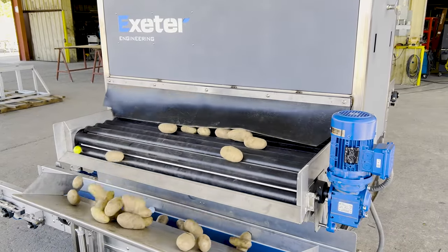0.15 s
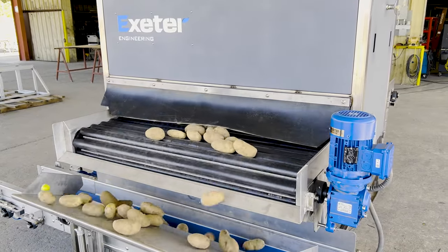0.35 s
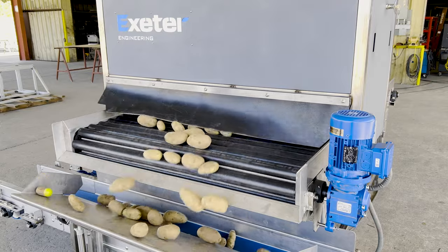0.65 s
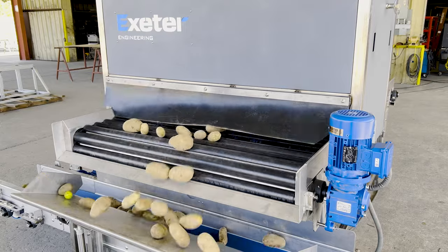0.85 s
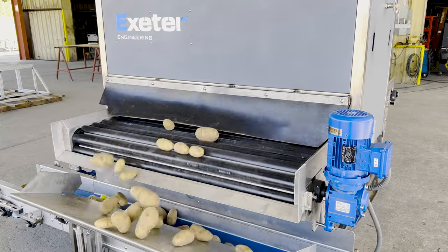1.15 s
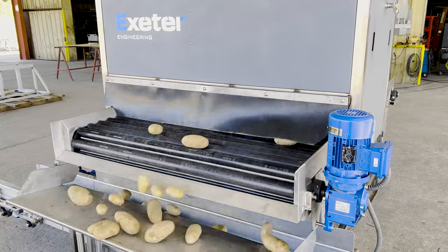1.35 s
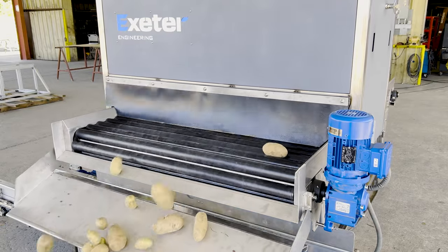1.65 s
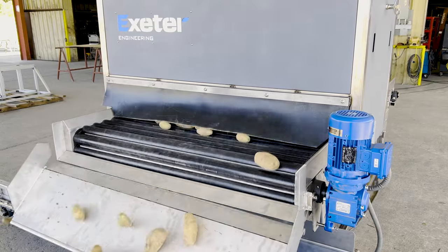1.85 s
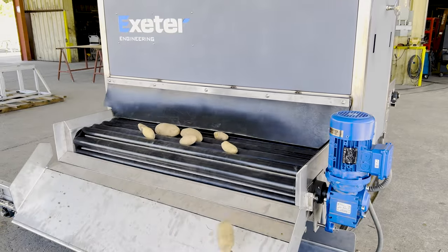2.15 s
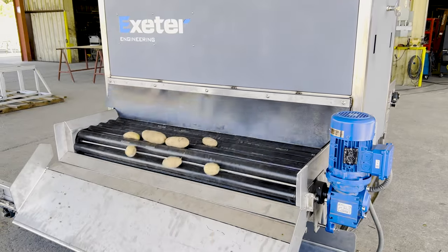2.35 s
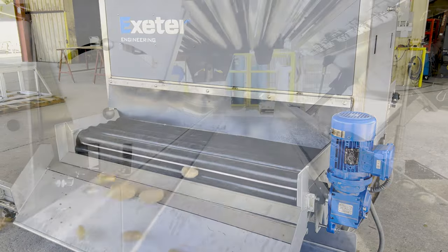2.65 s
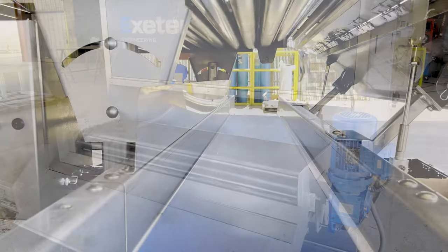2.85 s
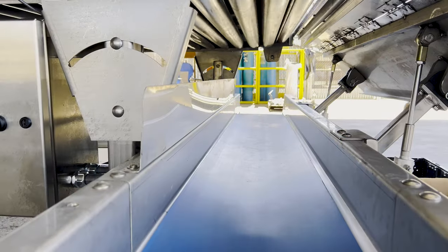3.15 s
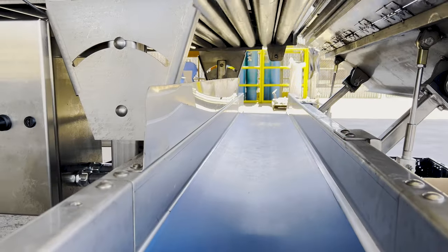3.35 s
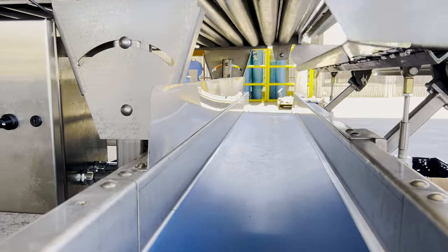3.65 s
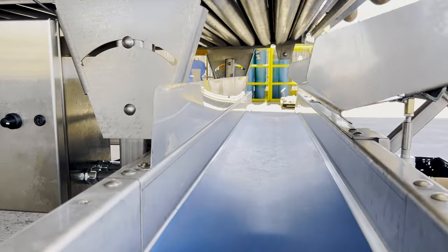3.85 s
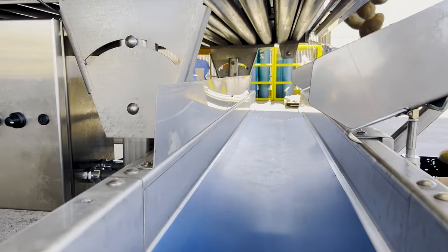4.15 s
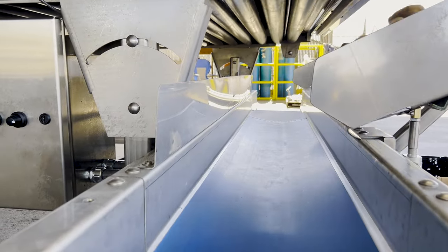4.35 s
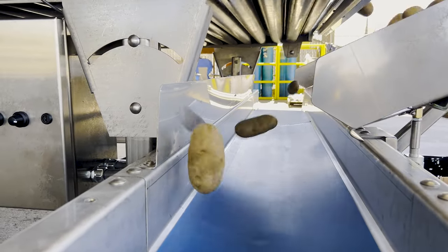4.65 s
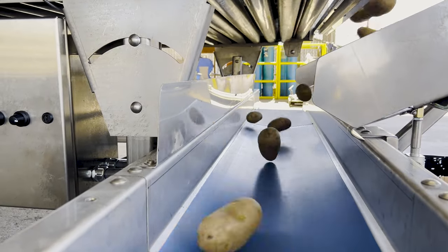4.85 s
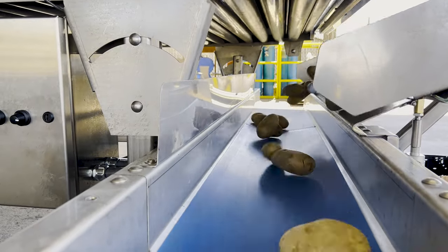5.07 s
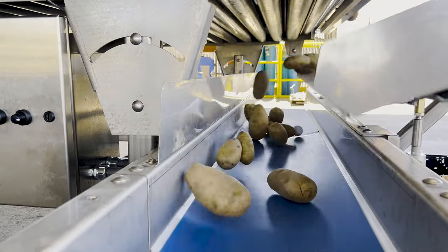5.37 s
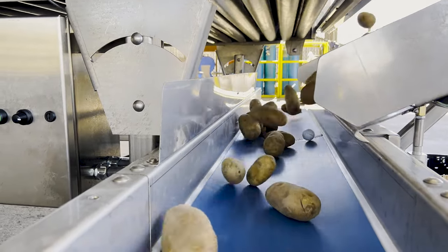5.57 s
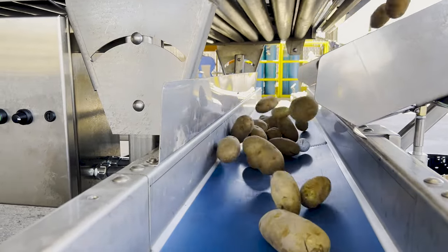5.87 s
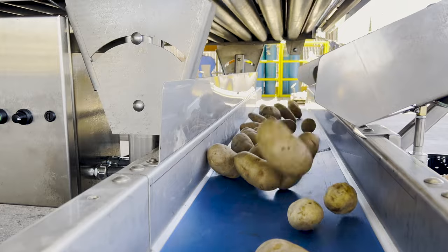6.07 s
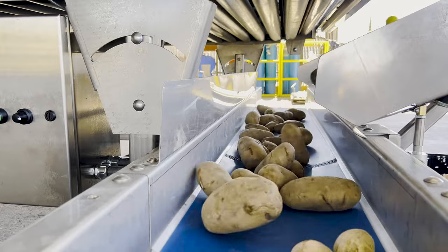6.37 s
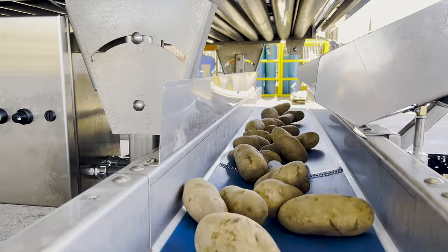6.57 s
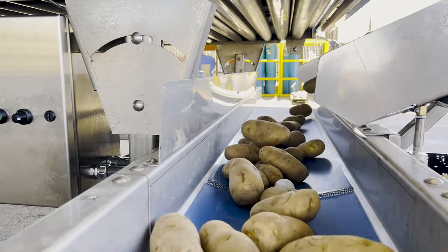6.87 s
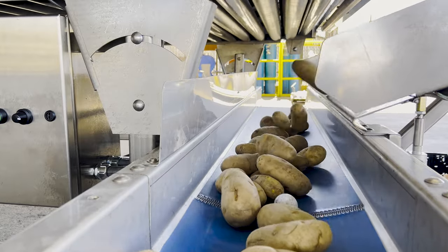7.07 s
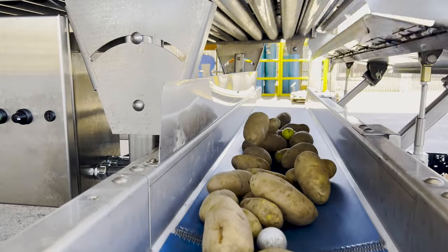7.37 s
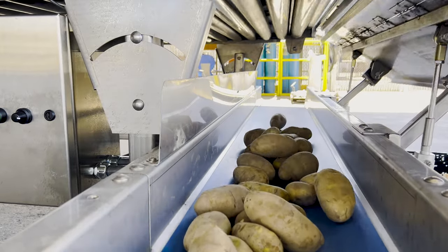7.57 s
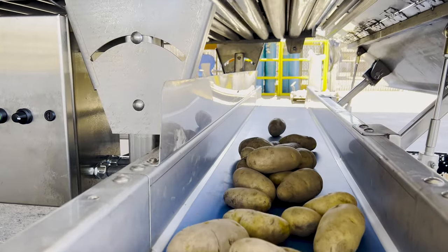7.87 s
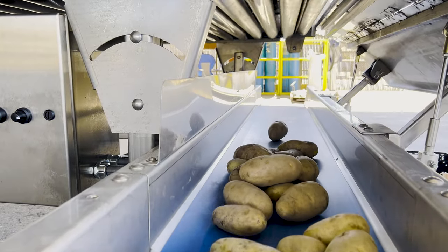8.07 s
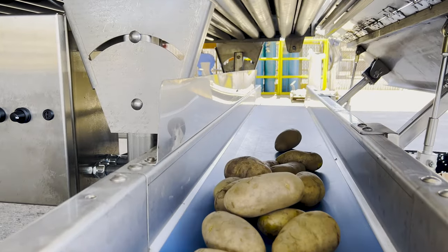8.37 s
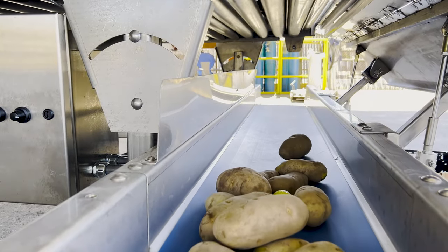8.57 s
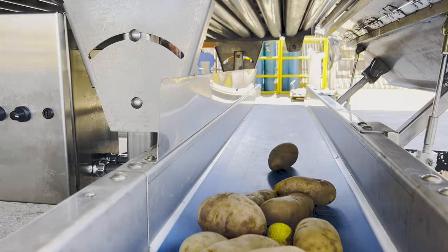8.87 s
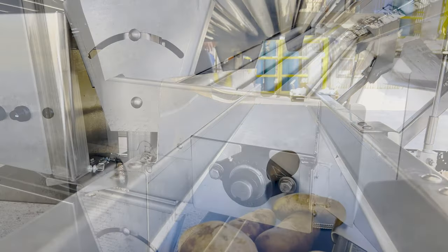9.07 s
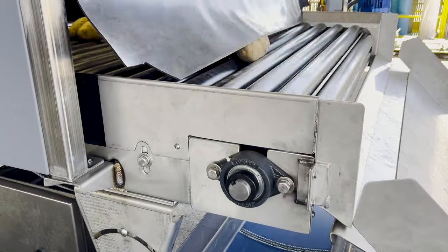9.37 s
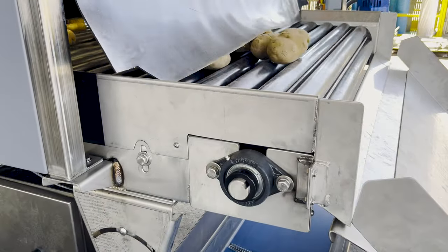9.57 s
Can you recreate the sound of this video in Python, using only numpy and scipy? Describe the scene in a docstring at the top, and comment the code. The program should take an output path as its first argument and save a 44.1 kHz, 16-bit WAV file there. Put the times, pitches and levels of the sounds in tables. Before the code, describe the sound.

Close conveyor machinery runs and rumbles while potatoes knock on ringing metal panels and scrape down a chute.

```python
"""A potato line in a shed, heard close on a two-port microphone from three spots that fade into each other.
At first potatoes thud on ringing panels and clack on steel rollers, over motors, rattle and a thin whine.
After a lull near 3 s a tilting sheet-metal chute drones as it swings, and the load tumbles and scrapes
down it. From about 7 s, by the belt, the thuds thin out and hard clacks stand out; the line sinks around
9 s and picks up at the very end. All along the shaking frame rumbles in both ports."""
import sys
import numpy as np
from scipy import signal
from scipy.fft import rfft, irfft, next_fast_len
from scipy.io import wavfile
from scipy.ndimage import uniform_filter1d, map_coordinates

SR = 44100
rng = np.random.default_rng(int(sys.argv[2]) if len(sys.argv) > 2 else 0)


def int16_out(signal):
    """Quantize to a 16-bit WAV file."""
    q = np.round(np.clip(np.atleast_2d(signal).T, -1, 1) * 32767)
    wavfile.write(sys.argv[1], SR, q.astype(np.int16))


N = 428652

# How busy the line is. Each row: time in seconds, then tumbling, motors, rattle and frame rumble in dB.
LINE_LEVELS = [(0.0, -31, -31.5, -37.5, -34.5), (0.81, -27.5, -31, -36.5, -33.5),
               (1.16, -31, -31.5, -36.5, -32), (1.54, -30.5, -29, -31.5, -38.5),
               (1.76, -31.5, -32, -37, -35.5), (2.19, -28.5, -32.5, -33, -38),
               (2.57, -45.5, -44, -46, -48.5), (2.98, -41, -39.5, -50.5, -35.5),
               (3.3, -26, -26, -33.5, -23), (3.44, -26, -26.5, -35, -28), (3.92, -28.5, -29, -34, -31),
               (4.09, -25.5, -32, -28, -24), (4.14, -22, -28, -34.5, -26.5),
               (5.06, -27.5, -28.5, -35, -27.5), (5.3, -25.5, -27, -38, -24),
               (5.52, -31, -32.5, -37, -36.5), (6.17, -25, -27, -39.5, -28), (6.44, -33, -33.5, -47, -34.5),
               (6.85, -26, -32, -39.5, -34), (7.04, -33.5, -33, -45, -34.5), (7.47, -35, -36.5, -45.5, -30),
               (7.58, -30.5, -29.5, -42, -38), (7.69, -32, -35.5, -40, -30), (8.64, -34.5, -32, -45.5, -34),
               (8.83, -41.5, -42.5, -49.5, -40), (9.23, -43.5, -41, -51, -48), (9.72, -32.5, -26, -35, -32)]
# Modes of the sheet-metal panels. Each row: pitch in Hz, width in Hz, level in dB.
PANEL_MODES = [(156, 20, -9), (220, 47, -11), (267.6, 18, 0), (323.4, 3.9, -3.5), (399, 115, 3),
               (460, 12, 0.5)]
# Colour of the motors and of a contact's body. Each row: frequency in Hz, level in dB.
MACHINE_SPECTRUM = [(300, -33.5), (520, 1.5), (800, 0), (1100, 0.5), (1600, -3), (2200, -13), (3500, -17),
                    (7000, -31)]
# Colour of rattling steel and of a contact's crack. Each row: frequency in Hz, level in dB.
RATTLE_SPECTRUM = [(900, -32.5), (1800, 11), (2500, 6), (4200, 1), (6500, -3), (8000, -9), (12000, -8),
                   (16000, -30)]
# The microphone from spot to spot. Each row: time in seconds, lag of the right port's middle band
# in seconds, likeness of the rumble in both ports from 0 to 1.
MIC_SPOTS = [(0, 0.000084, 1), (2.6, 0.000022, 0.99), (3., 0.00038, 0.66), (8.9, 0.00037, 0),
             (9.3, 0.00016, 1)]

STEEL_PARTS = 3
AGE = np.arange(SR // 3) / SR  # seconds since a contact began


def thuds():
    """Potatoes land on panels and belt: each soft blow rings one tone and a weaker overtone."""
    # Each row: start in seconds, level in dB, pitch in Hz, ring time to -60 dB in seconds.
    landings = [(0.031, -10, 172, 0.065), (0.2, -12, 212, 0.058), (0.259, -17.5, 318.5, 0.26),
                (0.394, -12, 323, .08), (0.423, -2.5, 350, 0.05), (0.44, 0.5, 332, 0.044),
                (0.475, -15.5, 184, 0.16), (0.547, -16, 317, 0.19), (0.681, -17, 176, 0.13),
                (0.717, -9.5, 361, 0.088), (0.812, -12, 332.7, 0.18), (0.85, -13, 324, 0.097),
                (0.903, -7.5, 207, 0.066), (0.97, -12, 317, 0.11), (1.089, -13, 166, 0.093),
                (1.166, -17.5, 183, 0.11), (1.223, -17, 187, 0.071), (1.345, -9, 188, 0.073),
                (1.373, -12, 333, 0.065), (1.426, -19, 320, 0.072), (1.488, -15.5, 122, 0.096),
                (1.517, -18, 282, 0.091), (1.315, 0.5, 328, 0.03), (1.622, -6.5, 263, 0.029),
                (1.663, -14.5, 220, .07), (1.701, -1.5, 210, 0.037), (1.885, -0.5, 252, 0.03),
                (1.944, -6.5, 325, 0.042), (2.161, -11, 230, 0.05), (2.418, -20, 312, 0.075),
                (3.287, -3, 302, 0.043), (3.409, -9, 130, 0.043), (3.459, 0.5, 148, 0.037),
                (3.949, -3.5, 342, 0.053), (3.997, -12, 198, 0.14), (4.026, -7, 334, 0.07),
                (4.075, -14, 370, 0.055), (4.125, -10, 167, 0.078), (4.185, -14, 327, 0.092),
                (4.251, -11, 168, 0.1), (4.299, -6, 261, 0.077), (4.336, -2, 260, 0.057),
                (4.343, -9, 420, .04), (4.365, -16, 230, .08), (4.423, -5, 185, 0.063),
                (4.509, -20.5, 387, 0.2), (4.567, -10, 139, 0.081), (4.583, -7, 240, 0.07),
                (4.612, -8, 344, 0.066), (4.691, -20, 398, 0.06), (4.721, -8, 197, 0.064),
                (4.735, -10, 400, 0.075), (4.767, -19, 330, 0.066), (4.826, -13, 153, 0.089),
                (4.859, -14, 340, 0.11), (4.912, -12, 181, 0.081), (4.985, -15, 300, 0.055),
                (5.136, -12, 246, 0.091), (5.29, -13, 480, .06), (5.378, -6.5, 304, 0.05),
                (5.403, -4.5, 192, 0.06), (5.418, -8, 380, .06), (5.425, -8, 160, 0.056),
                (5.736, -16, 163, 0.067), (5.891, -4, 230, 0.039), (5.972, -11, 420, .05),
                (5.995, -2.5, 242, 0.034), (6.084, -9, 143, 0.063), (6.12, -11, 130, .06),
                (6.15, -13, 200, 0.045), (6.265, -4, 332, 0.049), (6.366, -18.5, 196, 0.16),
                (6.585, -16.5, 318, .09), (6.69, -16, 400, 0.051), (6.747, -10, 209, 0.07),
                (6.762, -8.5, 393, 0.058), (7.77, -19, 361, 0.13), (8.3, -15.5, 352, 0.052),
                (8.734, -14.5, 489, 0.07), (8.752, -27, 258, 0.16), (9.639, -15, 435, 0.071)]
    low_hz, top_hz = 132, 458
    small = [(s, db, low_hz * (top_hz / low_hz) ** chance, 0.078)
             for s, db, chance in scatter(per_s=4, level_db=curves(LINE_LEVELS)[0] + 13)]
    out = np.zeros((2, N))
    for s, db, hz, t60 in landings + small:
        envelope = (1 - np.exp(-AGE / 0.0071)) * decay(max(t60, .01))
        tone = sine(hz) + 0.3 * sine(1.57 * hz)
        add(out, s, undb(db) * envelope * tone, pan_db=rng.normal(1, 4.5))
    return out


def knocks():
    """Hollow knocks on rollers and frame tubes: a short push, which shakes the panels, then a ring."""
    # Each row: start in seconds, level in dB, pitch in Hz, ring time to -60 dB in seconds.
    blows = [(0.423, -19, 553, 0.081), (0.432, -19, 830, .06), (0.441, -20, 1080, 0.08),
             (0.444, -20, 1380, .05), (0.722, -20, 964, .09), (0.735, -27, 823, 0.11),
             (0.76, -24, 807, .07), (0.83, -26, 1030, .06), (1.347, -20, 990, 0.042),
             (1.609, -19.5, 2260, .05), (1.884, -13, 1205, 0.045), (2.054, -24, 2160, 0.2),
             (2.057, -19, 1350, 0.097), (2.357, -14.5, 1653, 0.034), (2.509, -19.5, 1484, 0.025),
             (2.62, -34, 2210, .04), (3.938, -23, 580, 0.12), (4.012, -18, 600, .05),
             (4.02, -19, 1010, 0.08), (4.078, -19, 715, 0.051), (4.194, -13, 1010, 0.074),
             (4.342, -24, 1010, .05), (4.612, -23, 905, .04), (4.914, -12, 554, 0.029),
             (4.975, -18.5, 590, .09), (4.985, -21, 970, 0.06), (5.293, -15, 1150, 0.055),
             (5.32, -21, 1040, .05), (6.261, -13, 1040, 0.029), (6.581, -17, 1004, 0.14),
             (6.768, -18, 980, 0.084), (6.78, -22, 800, 0.099), (7.658, -20, 1020, 0.073),
             (8.058, -18, 1160, .059), (8.731, -16.5, 895, 0.037), (8.737, -23, 1160, .06),
             (8.742, -23.5, 595, 0.2), (9.507, -23.5, 1710, .049), (9.585, -9.5, 866, 0.029)]
    out, push = np.zeros((2, 2, N))
    for s, db, hz, t60 in blows:
        envelope = (1 - np.exp(-AGE / 0.0013)) * decay(np.clip(t60, .01, .2))
        beating = 0.82 * sine(hz) + 0.32 * sine(1.011 * hz)
        side_modes = 0.37 * decay(0.049) * (sine(1.12 * hz) + sine(hz / 1.12))
        overtone = 0.44 * decay(0.055) * sine(1.8 * hz)
        first_touch = np.exp(-AGE / 0.00067) * sine(0.73 * hz)
        add(out, s, undb(db) * (first_touch + envelope * (beating + side_modes + overtone)))
        add(push, s, undb(db - 36) * np.exp(-AGE / 0.00066))
    return out + ring(push, [(hz, db, 1.8 / width) for hz, width, db in PANEL_MODES])


def bumps():
    """Deep bumps through the frame swell and die in a few cycles."""
    # Each row: start in seconds, level in dB, pitch in Hz.
    jolts = [(0.687, -14, 106), (0.822, -21, 81), (1.075, -10, 129), (1.683, -12, 75), (1.909, -16, 73),
             (2.099, -15, 70.6), (3.617, -20, 76), (3.921, -8, 75), (4.266, -23, 67.7), (4.555, -5.5, 76.4),
             (4.66, -12, 80), (4.9, -25, 85), (4.94, -8, 73), (5.812, -10, 54), (6.266, -11, 68),
             (6.848, -14.5, 92), (7.424, -27, 75.4), (8.587, -17, 96)]
    envelope = (1 - np.exp(-AGE / 0.018)) * decay(0.13)
    out = np.zeros((2, N))
    for s, db, hz in jolts:
        add(out, s, undb(db) * envelope * sine(hz))
    return out


def clacks(noise):
    """Hard contacts on steel, each a burst of tiny impacts. Yields start, crack, body and pan."""
    # Each row: start in seconds, level in dB, body over crack in dB, time to -60 dB in seconds,
    # brightest frequency in Hz.
    hits = [(0.262, -20, -4, 0.087, 4850), (0.323, -19, -21, 0.1, 9100.0),
            (0.403, -18.5, -11, 0.064, 5410.0), (0.424, -7.5, -20.0, 0.039, 4330),
            (0.618, -20.5, -6, 0.055, 7390.0), (0.6734, -18, -5, 0.066, 7500),
            (0.715, -15, -1.0, 0.048, 1400.0), (0.81, -18, -9, 0.07, 3220.0),
            (0.965, -23.5, -2.5, 0.15, 1400.0), (1.099, -25.5, -3, 0.2, 1400.0),
            (1.295, -19, -5.0, 0.04, 1910.0), (1.318, -16.5, -19, 0.066, 4880.0),
            (1.551, -19.0, -19.0, 0.054, 2120.0), (1.608, -20, -3, 0.21, 9000),
            (1.859, -5.5, -13, 0.055, 9300), (1.879, -12.0, -5.5, 0.051, 3200),
            (2.048, -9.5, -11, 0.08, 2660), (2.105, -19, -6, 0.047, 2610.0),
            (2.1455, -27.0, -17.0, 0.061, 2900.0), (2.2614, -7.5, -18, 0.029, 3220.0),
            (2.3545, -10.5, -6, 0.036, 9150), (2.398, -21, -7, 0.046, 1720.0),
            (2.418, -22, -11, 0.04, 9100.0), (2.507, -10.5, -11, 0.025, 9200),
            (2.619, -33, 0, 0.027, 2120.0), (2.646, -35, -12.0, 0.03, 2610.0),
            (2.728, -33.0, -14, 0.071, 2350.0), (2.805, -33, -10.0, 0.04, 2900.0),
            (2.856, -32, -10.0, 0.04, 2610.0), (2.935, -30, -5.0, 0.036, 2350.0),
            (3.003, -26, -1, 0.052, 1910.0), (3.037, -24, 4, 0.033, 1400.0),
            (3.073, -32.0, -15.0, 0.04, 9100.0), (3.0967, -19, -10, 0.027, 2350.0),
            (3.141, -36, -6.5, 0.033, 1910.0), (3.175, -22, -15.0, 0.04, 9100.0),
            (3.242, -26.0, -9, 0.05, 2900.0), (3.317, -13, -19.0, 0.037, 1910.0),
            (3.382, -22, -7, 0.043, 1910.0), (3.496, -13.5, -15, 0.051, 4260),
            (3.592, -14.5, -6.0, 0.031, 2350.0), (3.69, -24.0, -4.0, 0.05, 3220.0),
            (3.718, -24.0, 3, 0.061, 1400.0), (3.862, -23, 7, 0.043, 1400.0),
            (3.9354, -20, -6.0, 0.047, 2120.0), (3.979, -22, -10, 0.045, 6660.0),
            (3.9973, -28, -15.0, 0.056, 7390.0), (4.1203, -18, -19.0, 0.11, 7390.0),
            (4.149, -11.5, -2, 0.037, 1400.0), (4.1924, -14, 5.5, 0.039, 1400.0),
            (4.26, -24.0, 5, 0.034, 1400.0), (4.294, -21.0, 2, 0.036, 1400.0),
            (4.3176, -17, -10, 0.056, 9100.0), (4.331, -17, -6, 0.084, 7390.0),
            (4.424, -20.5, -2, 0.052, 1720.0), (4.512, -20, 1, 0.065, 1400.0),
            (4.579, -15, 0.5, 0.056, 7390.0), (4.678, -22, -4.0, 0.047, 1720.0),
            (4.712, -19.5, -3.0, 0.052, 9100.0), (4.8219, -26, -3, 0.078, 2610.0),
            (4.852, -17.5, -17, 0.05, 6660.0), (4.915, -16, -2, 0.039, 2360),
            (4.9586, -22.5, 3.5, 0.12, 1720.0), (5.035, -26.5, -7, 0.081, 2610.0),
            (5.13, -21.0, -7.0, 0.095, 1720.0), (5.165, -25, -10, 0.06, 2900.0),
            (5.198, -34, -3.0, 0.043, 1400.0), (5.275, -22.0, -10.0, 0.04, 1400.0),
            (5.2943, -15.5, -3, 0.11, 3570.0), (5.411, -9.5, -18.0, 0.06, 6660.0),
            (5.433, -8, -23.0, 0.07, 9100.0), (5.549, -19.5, -17.0, 0.044, 7390.0),
            (5.715, -27, -10.0, 0.069, 6660.0), (5.938, -27.0, -15.0, 0.03, 9100.0),
            (5.962, -23, 2, 0.054, 9100.0), (6.001, -25.5, 0, 0.16, 1910.0),
            (6.097, -20, -2.0, 0.063, 9100.0), (6.1134, -18, -8, 0.069, 7390.0),
            (6.25, -16, -3.0, 0.076, 1400.0), (6.2605, -17.5, 7.5, 0.065, 1400.0),
            (6.352, -26.0, -8, 0.061, 9100.0), (6.427, -24.5, 2, 0.059, 2350.0),
            (6.527, -21, -1, 0.049, 1400.0), (6.579, -19.5, 3, 0.077, 1400.0),
            (6.608, -20.5, -6, 0.053, 6660.0), (6.645, -21, -15.0, 0.045, 8200.0),
            (6.692, -17, -12.0, 0.042, 9100.0), (6.7377, -15.5, -9, 0.043, 6660.0),
            (6.7535, -24, -2.0, 0.069, 1400.0), (6.86, -27, -10.0, 0.05, 1400.0),
            (6.944, -21.0, -7, 0.045, 2350.0), (7.085, -30, -5, 0.04, 1550.0),
            (7.195, -23.5, -20, 0.042, 6660.0), (7.3376, -24.0, -19, 0.052, 5960),
            (7.361, -28, 9, 0.032, 1550.0), (7.535, -12, -11.5, 0.1, 8900),
            (7.582, -18, -15.0, 0.04, 7390.0), (7.621, -14.0, -17, 0.027, 7390.0),
            (7.641, -6.5, -11, 0.13, 9100.0), (7.703, -18, -8.0, 0.06, 3570.0),
            (7.7663, -13.5, -24.0, 0.044, 4390.0), (7.8057, -19, -16, 0.05, 3960.0),
            (7.909, -11.5, -13, 0.03, 7350), (8.034, -27.0, -15.0, 0.04, 2610.0),
            (8.0557, -11, -5.5, 0.028, 7450), (8.1418, -10.5, -15, 0.03, 6500),
            (8.262, -18.5, -2.0, 0.04, 1400.0), (8.279, -27.0, -5.0, 0.03, 1400.0),
            (8.3788, -11, -12, 0.044, 6300), (8.443, -24.0, -15.0, 0.04, 6660.0),
            (8.547, -22.5, -26.0, 0.06, 7350), (8.563, -26, -14, 0.036, 1400.0),
            (8.595, -30, -15.0, 0.04, 1400.0), (8.667, -11, -14.0, 0.022, 6600),
            (8.7, -11.5, -16, 0.021, 6600), (8.732, -33.5, 12, 0.04, 1720.0),
            (8.8, -35, -20.0, 0.08, 9100.0), (8.984, -33, -15.0, 0.04, 6000.0),
            (9.025, -27, -4, 0.046, 1400.0), (9.115, -37.0, -15.0, 0.05, 9100.0),
            (9.27, -35, -15.0, 0.088, 9100.0), (9.345, -38, -8.0, 0.037, 1720.0),
            (9.412, -25.5, 4.5, 0.047, 3220.0), (9.5512, -24, -17.0, 0.05, 4390.0),
            (9.623, -26.0, -12.0, 0.05, 2610.0), (9.69, -26.0, -10, 0.05, 1400.0)]
    # Where the contacts sit as the load moves along. Each row: time in seconds, left over right in dB.
    load_position = [(0, 1.5), (3, 1), (7.6, -1.5), (7.9, 3.5), (8.7, 6.5), (9.3, 1)]
    pan_db = curves(load_position)[0]
    small = [(s, db, 3, .06, 1500 * 5 ** chance)
             for s, db, chance in scatter(per_s=5, level_db=curves(LINE_LEVELS)[2] + 5.5)]
    for s, db, body_db, t60, hz in hits + small:
        rise_s = min(.0026 * undb(-.4 * (db + 5)), .006)  # weaker contacts rise more slowly
        envelope = np.minimum(AGE / rise_s, 1) ** 2 * decay(max(t60, .005))
        burst = undb(db) * envelope * excerpt(noise, s)
        yield s, tint(burst, hz), undb(body_db) * burst, pan_db[int(s * SR)]


def scrapes(noise):
    """Potatoes scrape down sheet metal in stuttering swells. Yields start, crack, body and pan."""
    # Each row: start in seconds, level in dB, body over crack in dB, length in seconds.
    slides = [(0.415, -22.5, 3, 0.094), (0.714, -31.5, 4.5, 0.25), (0.825, -24, -11, 0.063),
              (1.327, -23.5, -2, 0.14), (1.874, -19, -11, 0.13), (1.942, -25.5, -9, 0.2),
              (2.09, -37, -8, 0.12), (3.257, -30, 1, 0.092), (3.47, -28, -10, 0.19),
              (3.932, -21, -5.5, 0.11), (3.99, -17.5, -1.5, 0.15), (4.033, -27, -12, 0.11),
              (4.137, -24, -2.5, 0.35), (4.33, -18.5, -3.5, 0.11), (4.436, -21.5, -6, 0.097),
              (4.596, -21, -2.5, 0.076), (4.724, -23.5, -4, 0.059), (4.84, -29.5, -2, 0.1),
              (5.37, -18.5, -5, 0.085), (5.414, -20, -3, 0.16), (6.106, -31, -6, 0.096),
              (6.687, -26, -3, 0.11), (6.747, -24.5, 0, 0.071), (7.658, -16.5, -5, 0.15),
              (7.773, -33.5, 1, 0.27), (9.593, -34, -12, 0.058)]
    stutter = 0.35 + 0.35 * grains(per_s=250, spread_db=6, t60=0.03)
    for s, db, body_db, length in slides:
        swell = np.sin(np.pi * np.minimum(AGE / max(length, .01), 1) ** 0.37)
        rub = undb(db) * swell * excerpt(stutter, s / 2) * excerpt(noise, s)
        yield s, tint(rub, hz=3700 * 1.9 ** rng.random()), undb(body_db) * rub, 0


def steel_contacts():
    """Each clack or scrape has a bright crack and a lower body; both ring one of the steel parts."""
    # How much brighter a hard contact is than the rattle. Each row: frequency in Hz, lift in dB.
    crack_lift = [(5000, 8), (10000, 7), (13500, 10.5), (16000, 21)]
    noise = np.pad(ports(rng.standard_normal((2, N))), ((0, 0), (0, len(AGE))))
    cracks, bodies = np.zeros((2, STEEL_PARTS, 2, N))
    for contacts in (clacks(noise), scrapes(noise)):
        for k, (s, crack, body, pan_db) in enumerate(contacts):
            add(cracks[k % STEEL_PARTS], s, crack, pan_db)
            add(bodies[k % STEEL_PARTS], s, body, pan_db)
    bodies = [colour(body, MACHINE_SPECTRUM) for body in bodies]
    rings = sum(ring(bodies[k] + 0.5 * cracks[k], steel_modes(k)) for k in range(STEEL_PARTS))
    bright = colour(colour(cracks.sum(axis=0), RATTLE_SPECTRUM), crack_lift)
    return undb(4) * bright + undb(-4.5) * sum(bodies) + undb(-11) * rings


def steel_modes(part):
    """Rollers and plates are alike but not tuned alike: each part shifts the modes a little."""
    # Each row: pitch in Hz, level in dB, ring time to -60 dB in seconds.
    modes = [(1003, -5, 0.16), (1281, -7.5, 0.049), (1380, -7.5, 0.079), (1580, -4, 0.048),
             (2026, -5, 0.092), (2243, 0.5, 0.076), (2676, -3, 0.14), (2859, 3, 0.085), (3250, -8, .07),
             (3800, -10, 0.054), (4050, -5.5, 0.077), (4870, -17, .08), (5470, -27, 0.097),
             (6670, -6, 0.09)]
    return [(hz * (1 + .035 * np.sin(2.1 * part + 1.7 * m)), db, t60)
            for m, (hz, db, t60) in enumerate(modes)]


def tumbling():
    """The bulk of the load: many soft contacts blur into a grainy noise that rings the panels."""
    # Each row: frequency in Hz, level in dB.
    spectrum = [(60, -42.5), (130, -2.5), (250, -4.5), (420, -1), (560, -8), (900, -40)]
    jostle = 1.5 + 0.85 * grains(per_s=70, spread_db=0, t60=0.048)
    load = colour(rng.standard_normal((2, N)) * jostle, spectrum)
    panels = ring(load, [(hz, db, 2.23 / width) for hz, width, db in PANEL_MODES])
    return unit(unit(load) + undb(-4.5) * unit(panels))


def chute_drone():
    """The sheet metal of the chute hums one low, slightly unsteady tone while it swings."""
    # Each row: time in seconds, level in dB.
    swing = [(2.8, -47), (3.35, -17.5), (3.392, -24), (3.472, -20), (3.576, -24.5), (4.01, -25.5),
             (4.082, -16.5), (4.13, -26), (4.2, -23), (4.25, -29), (4.33, -37)]
    t = np.arange(N) / SR
    gate = np.clip(np.minimum(t - swing[0][0], swing[-1][0] - t) / 0.073, 0, 1)
    tone = wavering_tone(hz=77.2, depth=.01, per_s=20)
    return np.sqrt(2) * gate * undb(curves(swing)[0] + 0.5 * walk(24.7)) * tone


def motors():
    """The motors run on as a fluttering midrange noise."""
    flutter = 1 + .3 * grains(per_s=120, spread_db=2.5, t60=.04)
    return unit(colour(rng.standard_normal((2, N)) * flutter, MACHINE_SPECTRUM))


def rattle():
    """Loose steel parts chatter without pause and ring a little; dull and bright ones shake separately."""
    split_hz, chatter = 4000, 0
    for side, contacts_per_s, waver_db, wavers_per_s in (("low", 60, 2.2, 9.8), ("high", 45, 4.2, 7.8)):
        shaking = 1.2 + .9 * grains(contacts_per_s, spread_db=3, t60=.07)
        half = signal.butter(2, split_hz, side, fs=SR, output="sos")
        band = signal.sosfilt(half, rng.standard_normal((2, N)) * shaking)
        chatter = chatter + band * undb(waver_db * walk(wavers_per_s))
    chatter = colour(chatter, RATTLE_SPECTRUM)
    rings = ring(chatter, steel_modes(0) + steel_modes(1))
    return unit(unit(chatter) + undb(-11.5) * unit(rings))


def frame_rumble():
    """Low shaking of the frame; near the belt it reaches each port differently."""
    # Each row: frequency in Hz, level in dB.
    spectrum = [(20, -72), (35, 2.5), (55, 16.5), (80, 20), (120, 14.5), (170, -45.5)]
    likeness = np.clip(curves(MIC_SPOTS)[1], 0, 1)
    mid, side = unit(colour(rng.standard_normal((2, N)), spectrum))
    return np.sqrt((1 + likeness) / 2) * mid + np.sqrt((1 - likeness) / 2) * np.array([side, -side])


def drive_whine():
    """A thin tone from the roller drive, off to the left, gone when the first spot fades."""
    end_s, fade_s = 2.6, .4
    gate = np.clip((end_s - np.arange(N) / SR) / fade_s, 0, 1)
    tone = wavering_tone(hz=4500, depth=.0004, per_s=8)
    left_right_db = np.array([[-51], [-55.5]])
    return gate * undb(left_right_db + 2.6 * walk(5.8)) * tone


def shed(x):
    """Nearby metal walls and the shed add a diffuse tail to the direct sound."""
    t60, tail_db = 0.45, -8
    t = np.arange(SR) / SR
    tail = ports(rng.standard_normal((2, SR))) * undb(-60 * t / t60) * (t > .004)
    tail /= np.sqrt(np.sum(tail ** 2) / 2)
    return x + undb(tail_db) * signal.oaconvolve(x.mean(axis=0)[None], tail, axes=1)[:, :N]


def ports(x):
    """Two unrelated signals become left and right: alike in the bass, treble phase turned by the ducts."""
    # Each row: frequency in Hz, likeness of left and right from 0 to 1.
    port_likeness = [(60, 0.92), (130, 0.83), (300, 0.84), (600, 0.57), (1200, 0.26), (4000, 0),
                     (8000, 0.32), (10000, 1), (12000, 0.8), (13900, 1), (15500, 0)]
    # Each row: frequency in Hz, left over right in dB.
    port_balance = [(60, -2), (110, -1), (200, 1.5), (380, 2), (700, 1), (1290, 0), (2380, 0), (4400, 6.5),
                    (8120, 2), (15000, -2)]
    # Each row: frequency in Hz, phase lead of the left port in radians.
    duct_phase = [(3000, 0), (6500, -2.5), (8600, -6.3), (9700, -9.), (10400, -9.8), (12200, -12.6),
                  (13400, -15.2), (14300, -16.2), (15300, -18.8), (16000, -19.5)]
    size = next_fast_len(x.shape[1])
    likeness = np.clip(over_hz(port_likeness, size), 0, 1)
    tilt = undb(over_hz(port_balance, size) / 2) * np.exp(.5j * over_hz(duct_phase, size))
    mid, side = rfft(x, size) * np.sqrt([(1 + likeness) / 2, (1 - likeness) / 2])
    return irfft(np.array([(mid + side) * tilt, (mid - side) / tilt]), size)[:, :x.shape[1]]


def port_lag(x):
    """The right port hears the middle band a fraction later, by an amount that depends on the spot."""
    left, right = x
    band = signal.sosfiltfilt(signal.butter(2, [630, 1550], "band", fs=SR, output="sos"), right)
    late = map_coordinates(band, [np.arange(N) - curves(MIC_SPOTS)[0] * SR], order=1, mode="nearest")
    return np.array([left, right - band + late])


def undb(db):
    """Decibels to gain."""
    return 10 ** (np.asarray(db) / 20)


def unit(x):
    """Scale to rms 1."""
    return x / np.sqrt(np.mean(x ** 2))


def sine(hz):
    """One mode of a contact, undamped."""
    return np.sin(2 * np.pi * hz * AGE)


def decay(t60):
    """A contact's fall by 60 dB in t60 seconds."""
    return undb(-60 * AGE / t60)


def excerpt(x, s):
    """One contact's length of x, from s seconds on."""
    return x[..., int(s * SR):][..., :len(AGE)]


def add(out, s, sound, pan_db=0):
    """Mix a sound in at s seconds, pan_db louder on the left."""
    i = int(s * SR)
    out[:, i:i + sound.shape[-1]] += undb(np.array([[pan_db], [-pan_db]]) / 2) * sound[..., :N - i]


def curves(table):
    """The columns that follow a table's time column, one value per sample."""
    s, *columns = np.transpose(table)
    return [np.interp(np.arange(N) / SR, s, column) for column in columns]


def over_hz(table, size):
    """Rows of frequency and value, read at the bins of a transform."""
    hz, value = np.transpose(table)
    return np.interp(np.log(np.maximum(np.fft.rfftfreq(size, 1 / SR), 1)), np.log(hz), value)


def colour(x, spectrum, size=8192):
    """Causal filter of unit energy, shaped by rows of Hz and dB."""
    cepstrum = irfft(over_hz(spectrum, size) * np.log(10) / 20)
    cepstrum[1:size // 2] *= 2
    cepstrum[size // 2 + 1:] = 0
    response = irfft(np.exp(rfft(cepstrum)))[:size // 2]
    return signal.oaconvolve(x, response[None] / np.sqrt(np.sum(response ** 2)), axes=1)[:, :N]


def tint(x, hz):
    """A contact is brightest around its own pitch."""
    return .45 * x + 1.25 * signal.lfilter(*signal.iirpeak(hz, Q=1.2, fs=SR), x)


def ring(x, modes):
    """A bank of resonators driven by x, one for each row of Hz, dB and seconds to -60 dB."""
    out, x = 0, x + 1e-12
    for hz, db, t60 in modes:
        radius = np.exp(-np.log(1000) / (max(t60, .005) * SR))
        angle = 2 * np.pi * hz / SR
        mode = signal.lfilter([1], [1, -2 * radius * np.cos(angle), radius ** 2], x)
        out = out + undb(db) * np.sqrt(1 - radius) * np.sin(angle) * mode
    return out


def walk(per_s):
    """Random values, per_s of them a second, smoothed twice."""
    hold = int(SR / per_s)
    steps = np.repeat(rng.standard_normal(N // 200 + 1), hold)[:N]
    return uniform_filter1d(uniform_filter1d(steps, hold), hold)


def wavering_tone(hz, depth, per_s):
    """A sine whose pitch wanders at random around hz."""
    return np.sin(2 * np.pi * np.cumsum(hz * (1 + depth * walk(per_s))) / SR)


def grains(per_s, spread_db, t60):
    """Envelope of many random contacts with a soft onset; spread_db makes a few harder than most."""
    struck = rng.random(N) < per_s / SR
    strength = undb(spread_db * np.minimum(rng.exponential(size=N), 3))
    tails = signal.lfilter([1], [1, -np.exp(-np.log(1000) / (t60 * SR))], struck * strength + 1e-12)
    return unit(uniform_filter1d(tails, size=SR // 250))


def scatter(per_s, level_db):
    """Random events up to 6 dB under a level curve. Each row: start in seconds, dB, chance from 0 to 1."""
    gap, softness, chance = rng.random((200, 3)).T
    s = np.cumsum(-np.log(1 - gap)) / per_s
    heard = s < (N - 1) / SR
    return zip(s[heard], level_db[(s[heard] * SR).astype(int)] - 6 * softness[heard], chance[heard])


def scene():
    """Single contacts echo in the shed over the running line, all heard through the two ports."""
    tumble_db, motor_db, rattle_db, rumble_db = curves(LINE_LEVELS)
    running = tumbling() * undb(tumble_db) + motors() * undb(motor_db) + rattle() * undb(rattle_db)
    roughness = undb(1.04 * walk(150))  # bouncing skins damp the panels unevenly
    contacts = steel_contacts() + (thuds() + knocks() + bumps()) * roughness
    airborne = shed(contacts) + ports(running) + chute_drone() + drive_whine()
    return port_lag(airborne) + frame_rumble() * undb(rumble_db)


def record(dry):
    """The recorder rounds the loudest peaks and cuts the top above 16 kHz."""
    rounded = np.tanh(1.244 * dry) / 0.99
    return signal.sosfilt(signal.ellip(10, .2, 80, 16000, fs=SR, output="sos"), rounded)


dry = scene()
out = record(dry)
int16_out(out)
```